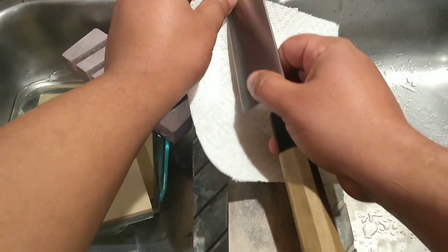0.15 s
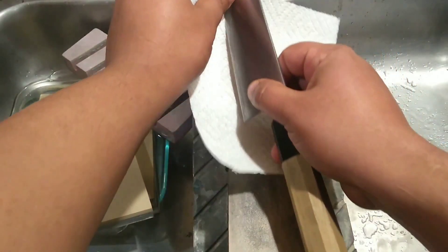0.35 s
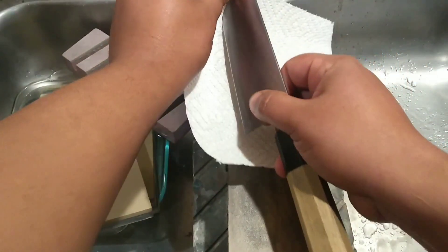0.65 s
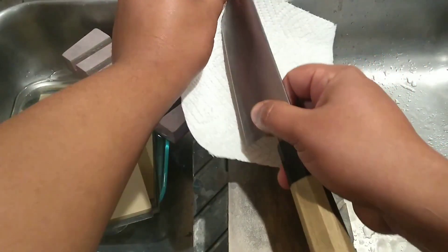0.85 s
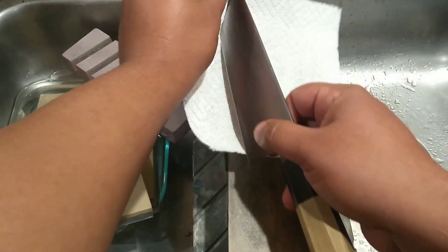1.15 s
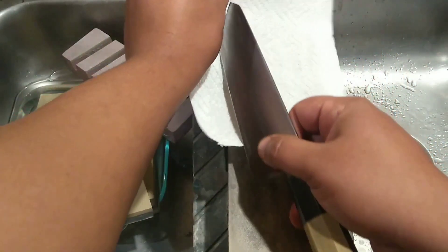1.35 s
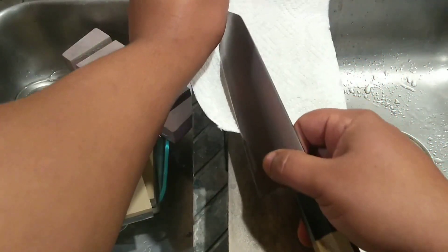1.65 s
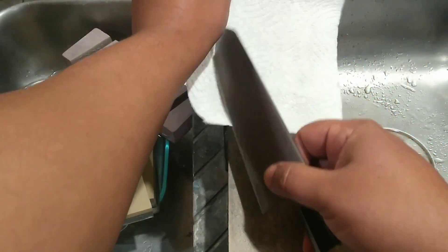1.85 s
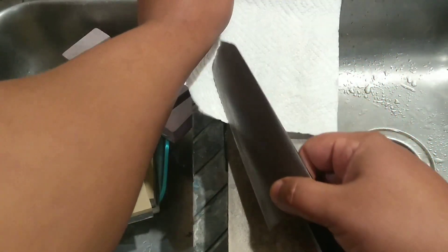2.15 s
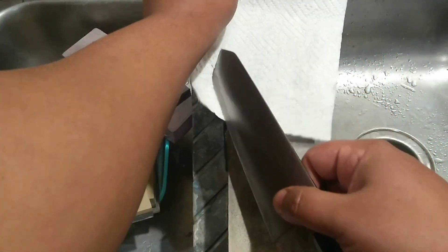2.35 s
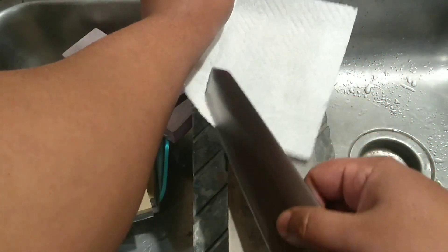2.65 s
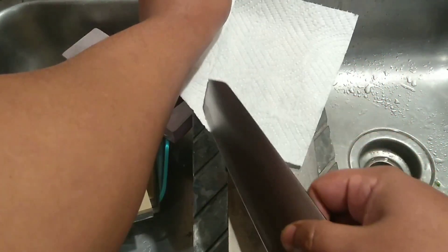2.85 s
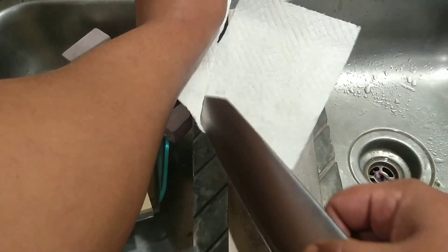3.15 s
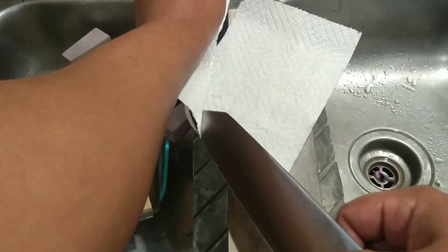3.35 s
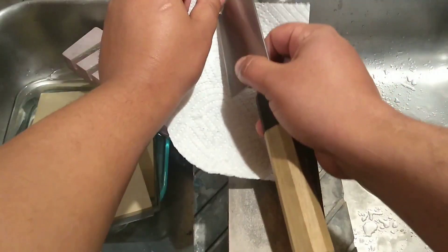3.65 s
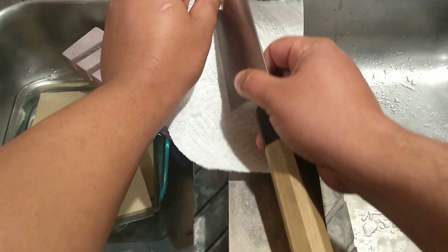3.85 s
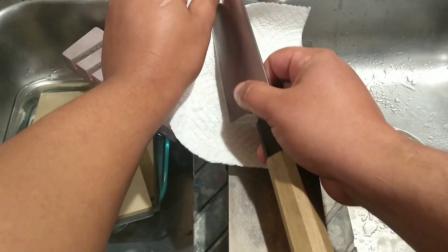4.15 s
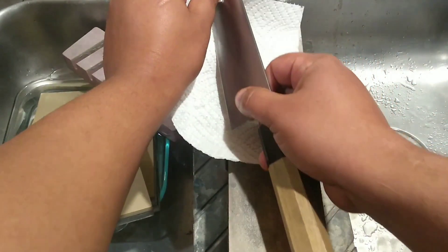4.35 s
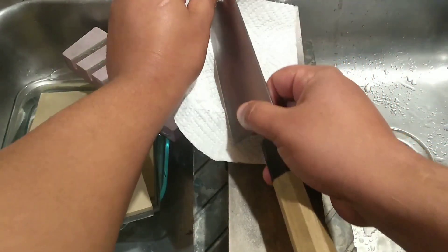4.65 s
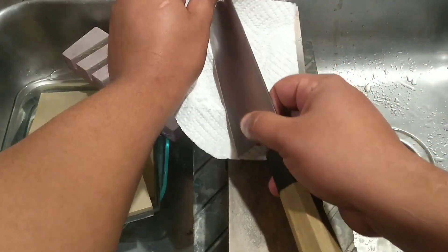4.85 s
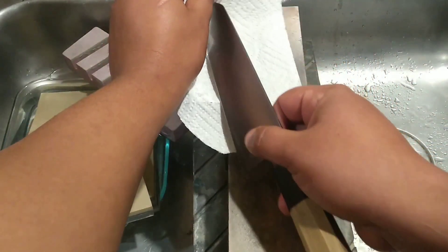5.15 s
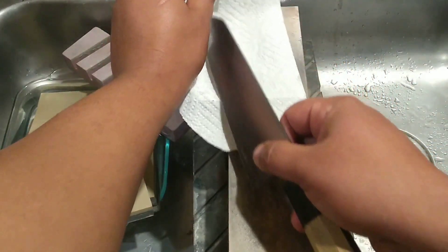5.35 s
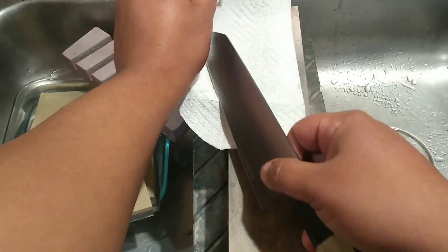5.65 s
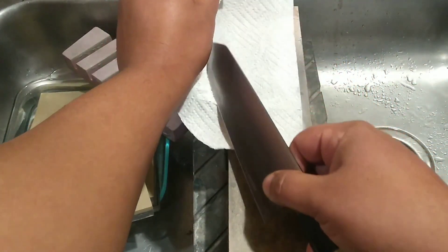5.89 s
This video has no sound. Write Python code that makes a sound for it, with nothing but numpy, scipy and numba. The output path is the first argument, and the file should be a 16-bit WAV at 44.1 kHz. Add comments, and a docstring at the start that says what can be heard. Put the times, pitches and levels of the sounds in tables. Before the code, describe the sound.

Close at a kitchen sink, a keen blade is drawn through a paper towel. Faint, broken scratches gather into coarse, crackling rips with papery hums and fine fizz. The cut ends; a tiny tick and a dull, low-ringing knock follow, cut off abruptly. A second draw starts thin and builds into rough tearing again. Quiet room, close stereo microphones.

```python
"""Knife cutting a paper towel

A sharpened kitchen knife is drawn twice, heel to tip, through a paper towel held over the whetstone at a sink.
Snap-modulated noise and sharp releases excite the spectra of the rasp, the sheet's modes and a fine fizz.
In spells the sheet hums with a gliding pitch; shaped noise makes a low rumble that swells, and a room tone.
Between the draws come a faint tick and a short dull burst with a low ring, stopped abruptly."""
import sys
import numpy as np
from scipy import signal
from scipy.fft import rfft, irfft, next_fast_len
from scipy.io import wavfile
from scipy.ndimage import uniform_filter1d, map_coordinates
from numba import njit

SR = 44100
rng = np.random.default_rng(int(sys.argv[2]) if len(sys.argv) > 2 else 0)


def store_pcm(level_fs):
    """Save levels as 16-bit WAV."""
    pcm = np.round(np.clip(level_fs, -1, 1) * 32767).astype(np.int16)
    wavfile.write(sys.argv[1], SR, np.atleast_2d(pcm).T)


N = 265482
SIZE = next_fast_len(N + SR // 2, real=True)
FREQS = np.fft.rfftfreq(SIZE, 1 / SR)
TIME = np.arange(N) / SR

# the edge catches and breaks through: (time [s], relative crack level [dB], thump relative to crack [dB],
# fizz relative to crack [dB], build-up time constant [s])
CATCHES = [(0.064, -49.5, -14, -14, 0.0039), (0.4494, -49.0, -9, -25, 0.0026),
           (0.639, -57, -22, -17, 0.0038), (0.6596, -50.5, -6, -11, 0.00061),
           (1.151, -43.5, -7, -23, 0.003), (1.3548, -48, 9, -21, 0.00046), (1.4488, -42.5, 2, -21, 0.00083),
           (1.6183, -41.5, -15, -24, 0.00036), (1.6764, -46.0, -5, -13.0, 0.0005),
           (1.7532, -45, -6, -15.0, 0.0025), (2.016, -33.5, -0.5, -13, 0.0039),
           (2.0981, -44, 6, -16, 0.0005), (2.3067, -43, 0, -5, 0.0021), (2.413, -31.5, -7, -16, 0.00058),
           (2.5721, -34.5, -3.5, -12, 0.00085), (2.6233, -50, 5, -8.5, 0.00058),
           (2.7709, -33.0, 4, -11, 0.0026), (2.8116, -33, -1.5, -13.5, 0.003),
           (2.8361, -28, -3, -17.5, 0.0033), (2.8553, -32.5, -5, -16, 0.0025),
           (2.894, -32, -5, -23, 0.0022), (2.902, -30.5, -7, -14.5, 0.0048),
           (2.934, -30.5, -13, -11.5, 0.003), (2.993, -37.5, -2, -19, 0.00041),
           (3.0144, -32, -3.5, -16.5, 0.00039), (3.2593, -31.5, -8, -13, 0.0042),
           (3.315, -35.5, 1.5, -16, 0.00046), (3.343, -37.5, -6, -10.5, 0.0043),
           (3.3832, -49.5, 8.5, -21, 0.00059), (3.4051, -30.5, -9.5, -17.5, 0.0033),
           (3.9917, -51, -25.0, -3.0, 0.00044), (4.0122, -48.5, -15, -5, 0.00046),
           (4.3524, -40.5, -1.5, -8, 0.0024), (4.7297, -49, -4, -31, 0.00059),
           (4.7625, -35.5, -29, -19, 0.00044), (4.8065, -42, -10, -17, 0.00054),
           (5.0724, -33, -16, -20.0, 0.001), (5.1513, -50, -17.5, -14, 0.0005),
           (5.2375, -46, -41, -14, 0.00056), (5.271, -45, -31.0, -9.5, 0.003),
           (5.4452, -33.5, -2.5, -15.0, 0.00066), (5.5638, -41.5, 0, -9, 0.0035),
           (5.7555, -38.5, -1.0, -17, 0.0005), (5.8506, -37.5, 0, -19, 0.00046),
           (5.8794, -29.0, 0, -17, 0.0027), (5.8997, -35.5, -6, -13.5, 0.00054),
           (6.0113, -42, 0.0, -10, 0.00046)]


def amp(db):
    """Level is logarithmic: decibels to amplitude ratio."""
    return 10 ** (np.asarray(db) / 20)


def unit(x):
    """Mean power sets the scale: normalise to rms 1."""
    return x / np.sqrt(np.mean(np.abs(x) ** 2) + 1e-20)


def along(points):
    """Spectra are interpolated on a logarithmic frequency axis, from (frequency [Hz], value) points."""
    hz, value = np.transpose(points)
    return np.interp(np.log(FREQS + 1), np.log(hz + 1), value)


def wobble(rate):
    """Slow random modulation: a smooth curve through Gaussian knots, rate [1/s]."""
    knots = rng.standard_normal(int(N * rate / SR) + 4)
    return map_coordinates(knots, [TIME * rate])


def filtered(x, response):
    """Linear filtering: the spectrum is multiplied by a frequency response."""
    return irfft(rfft(x, SIZE) * response, SIZE)[..., :N]


def colour(points, rings=()):
    """Minimum phase: the folded cepstrum of a level curve gives a causal response of energy 1."""
    level_db = along(points)
    for hz, width_hz, db in rings:
        level_db = level_db + db / (1 + (2 * (FREQS - hz) / width_hz) ** 2)
    cepstrum = irfft(np.log(amp(level_db) + 1e-6), SIZE)
    cepstrum[1:SIZE // 2] *= 2
    cepstrum[SIZE // 2 + 1:] = 0
    return unit(np.exp(rfft(cepstrum)))


def stereo(mid, side):
    """Sum and difference: left and right from middle and side."""
    return np.array([mid + side, mid - side])


@njit
def resonate(x, hz, width_hz):
    """Two-pole resonance with a moving pitch; the bandwidth sets its damping."""
    y = np.zeros(len(x))
    r = np.exp(-np.pi * width_hz / SR)
    for i in range(2, len(x)):
        drive = x[i] - x[i - 2]
        y[i] = 2 * r * np.cos(2 * np.pi * hz[i] / SR) * y[i - 1] - r * r * y[i - 2] + drive
    return y


def effort():
    """Excitation envelopes: rasp, drumming and fizz levels [dB] of pushes that rise, swell and let go."""
    # pushes of the edge through the paper: (start [s], length [s], relative rasp level [dB],
    # swell from start to end [dB], drumming relative to rasp [dB], fizz relative to rasp [dB])
    surges = [(0.0, 0.13, -68, 5, -2, -2), (0.139, 0.03, -56.5, -4, -3.5, -11.5),
              (0.185, 0.064, -66, -8, -7, -3.5), (0.339, 0.0055, -66.5, 11.5, -25, -12.5),
              (0.41, 0.12, -54, -3, -5, -11), (0.554, 0.1, -68, -1, -4, -15.0),
              (0.693, 0.0065, -53.5, 1, -9, -10), (0.736, 0.048, -50.0, -3.5, -1, -13.5),
              (0.816, 0.074, -68.5, 16, -4.0, -17), (0.907, 0.025, -53.5, 0.5, -12.5, -14.5),
              (1.047, 0.055, -59, 13, -7.5, -17), (1.12, 0.066, -51.0, -4, 1.5, -13),
              (1.247, 0.0084, -57, -7, -6, -17.0), (1.318, 0.11, -56, 12.5, 2.5, -15),
              (1.455, 0.053, -44, -1.5, 1, -14.5), (1.615, 0.094, -48, 3.5, -3.5, -12.5),
              (1.743, 0.052, -45, -5.5, -5, -12.5), (1.885, 0.18, -43, 3, -5, -13.5),
              (2.111, 0.11, -46.5, -3.0, 3.5, -11), (2.269, 0.047, -40, 1, 4.5, -12.5),
              (2.366, 0.067, -43.5, -1, 2.0, -10), (2.479, 0.076, -46.5, -11.5, -0.5, -9),
              (2.582, 0.17, -56, 6.5, -0.5, -9), (2.763, 0.18, -43.5, 5.5, -1.5, -13),
              (3.026, 0.022, -48, -2, -4, -13.5), (3.124, 0.014, -59.5, 11.5, 2.5, -19.0),
              (3.183, 0.091, -40, 6.5, -5, -14), (3.327, 0.098, -42.0, -1.5, -1.5, -11.5),
              (3.58, 0.12, -69.5, -4, -3.0, -10.0), (3.752, 0.024, -63.5, -3, -16, -2.5),
              (3.86, 0.01, -62.5, 6, -25, -8.0), (3.919, 0.045, -59, -3.5, -31, -2),
              (3.992, 0.041, -59, 8, -10, -2.5), (4.082, 0.071, -58.5, -3.5, 1.5, -2.5),
              (4.19, 0.033, -56.5, 5.0, -1, -6.5), (4.325, 0.026, -51, 7, -10.5, -10.5),
              (4.397, 0.19, -66.5, -5, -3.5, -15.5), (4.599, 0.055, -55.5, -2.5, -1.5, -16.5),
              (4.734, 0.09, -47.5, -10, -9.5, -15.0), (4.862, 0.039, -52, -6, -11.5, -15.5),
              (4.92, 0.13, -62.5, 13, -24, -17.0), (5.051, 0.062, -48, 5.5, -15.5, -13.5),
              (5.203, 0.089, -49.5, 2.5, -33, -13), (5.314, 0.111, -52.5, 6.5, -10.5, -14.5),
              (5.447, 0.12, -45.5, 2, -7, -13.0), (5.535, 0.053, -40, 4.5, 1, -10.0),
              (5.716, 0.07, -47, -1.5, -1, -14), (5.866, 0.045, -44.5, 3, 0, -11.5),
              (6.008, 0.014, -45.5, 16, -3, -21)]
    # the blade sliding between pushes: (rasp, drumming, fizz), relative levels [dB]
    slide_db = (-74, -90.5, -82)
    attack_s, release_s = 0.034, 0.038  # time to gain or lose 20 dB
    power = amp(slide_db)[:, None] ** 2 * np.ones(N)
    for start, length, db, swell_db, drum_db, fizz_db in surges:
        reach = length / 2 + 4 * (attack_s + release_s)
        near = np.abs(TIME - start - length / 2) < reach
        t = TIME[near] - start
        fade = np.maximum(-t, 0) / attack_s + np.maximum(t - length, 0) / release_s
        swell = swell_db * (np.clip(t / length, 0, 1) - 0.5)
        level = amp(db + swell - 20 * fade)
        power[:, near] += (amp([[0], [drum_db], [fizz_db]]) * level) ** 2
    return 10 * np.log10(power)


def fibres(rate, spread_db, life, clump_db, rub, slip_rate, slip_life, slip_db):
    """Shot noise: random snaps over a smooth rub, rms 1; each slip starts a dying flurry."""
    snap_db = spread_db * np.minimum(rng.standard_normal(N), 2)
    sizes = (rng.random(N) < rate / SR) * amp(snap_db)
    power = signal.lfilter([1], [1, -np.exp(-1 / (life * SR))], sizes ** 2)
    slip_starts = 1.0 * (rng.random(N) < slip_rate / SR)
    slips = signal.lfilter([1], [1, -np.exp(-1 / (slip_life * SR))], slip_starts)
    strength = np.sqrt(power / power.mean() + abs(rub))
    return unit(strength * amp(clump_db * wobble(70) + slip_db * np.tanh(slips)))


def catches(levels_db, t60, scatter):
    """Strain and release: fraying builds exponentially to a sharp middle impulse and a dying spray."""
    fray_s = 0.011  # a build-up this long doubles the spray factor beside the release
    lead = SR // 20
    force = np.zeros((2, N + SR))
    t = np.arange(-lead, 2 * lead) / SR
    for (s, *_, build_s), db in zip(CATCHES, levels_db):
        decay = amp(-60 * np.maximum(t, 0) / t60)
        build_up = np.exp(np.minimum(t, 0) / build_s)
        spray = rng.standard_normal((2, len(t))) * decay * build_up
        spray *= scatter * (1 + build_s / fray_s) / np.linalg.norm(spray[0])
        spray[0, lead] += 1
        event = spray / np.linalg.norm(spray, axis=1, keepdims=True)
        force[:, round(s * SR):][:, :len(t)] += amp(db) * event
    return force[:, lead:lead + N]


def wander(force, depth_db):
    """Time-varying excitation: the moving edge favours different frequencies from moment to moment."""
    spectrum = signal.stft(force, nperseg=1024)[2]
    field = rng.standard_normal(spectrum.shape[1:])
    for size in (3, 4):
        field = uniform_filter1d(field, size=size, axis=0)
        field = uniform_filter1d(field, size=2 * size, axis=1)
    gain = unit(amp(depth_db * unit(field)))
    return signal.istft(spectrum * gain, nperseg=1024)[1][:, :N]


def rasp(force, side_db, body_hz, deep_hz, high_hz):
    """Forced resonance: parting fibres ring in paper and blade, and a slack sheet rings lower."""
    # rasp spectra in the middle and at the sides: (frequency [Hz], relative density [dB])
    mid_spectrum = [(360, -44), (620, -19.5), (676, -11.5), (907, -1), (1030, -2.5), (1420, 1.5),
                    (1660, -4), (1770, -10.5), (1910, -13.5), (2210, -24), (2610, -18), (3130, -4),
                    (3470, -5.5), (4380, -17), (4900, -64), (6370, -49), (10800, -120)]
    side_spectrum = [(360, -26), (620, -14.5), (706, -7.5), (818, -12), (955, -15.5), (1090, -22.5),
                     (1260, -32), (1450, -7), (1800, -5.5), (2080, 1), (2270, -3), (2970, -8.5),
                     (3470, -15), (4340, -5), (4900, -10), (6370, -72), (10800, -120)]
    # resonances of blade and sink: (frequency [Hz], width [Hz], level change [dB])
    rings = [(621, 12, 13), (774, 35, 6.5), (898, 14, 3.5), (946, 110, 3.5), (1093, 26, 5), (1252, 22, 3),
             (1422, 170, 3), (1628, 29, 6), (1867, 32, 4.5), (2590, 85, 8), (2560, 20, -2.5), (2873, 27, 6),
             (2998, 98, 5.5), (3357, 123, 5), (3590, 44, 7.5), (3960, 107, 6)]
    # slackening of the cut sheet: (time [s], low edges raised and high edge lowered by [dB])
    slack = [(0, -3.5), (.6, 3.5), (1.5, 1.5), (2.1, 3.5), (2.85, 1.5), (3.45, 6), (3.9, -8.5), (4.5, 2),
             (5.1, -1), (5.55, -1.5), (6.02, 0.5)]
    slack_db = np.interp(TIME, *np.transpose(slack))

    def band(hz, width_hz):
        return filtered(force, np.exp(-((FREQS - hz) / width_hz) ** 2))

    low_edges = band(body_hz, 255) + band(deep_hz, 570)
    high_edge = band(high_hz, 500)
    mid, side = force + (amp(slack_db) - 1) * low_edges + (amp(-slack_db) - 1) * high_edge
    mid = filtered(mid, colour(mid_spectrum, rings))
    return stereo(mid, amp(side_db) * filtered(side, colour(side_spectrum, rings)))


def hum_spells():
    """Frequency modulation: spells of humming, each with a gliding pitch [Hz] and drumming share [0-1]."""
    # spells of humming: (start [s], length [s], pitch [Hz], glide from start to end [Hz],
    # share of the drumming [0-1])
    hums = [(0, .08, 253.7, 14.5, 0.86), (1.361, .36, 318.2, 19, 0.57), (2.1, 0.0619, 197, 10, 0.29),
            (3.592, 0.13, 275, -26, 0.8), (3.998, .17, 312, 17, 0.97), (4.336, 0.085, 322, -7.5, 0.67),
            (5.363, 0.14, 252, 22, 0.69), (5.73, 0.055, 266, 11.5, 0.48)]
    rest_hz, rest_share = 299.4, 0.028  # between spells
    ease_s = 0.087  # time to fade into or out of a spell
    pitch, share = np.full(N, rest_hz), np.full(N, rest_share)
    for start, length, hz, glide_hz, spell_share in hums:
        t = TIME - start
        presence = np.clip(1 + np.minimum(t, length - t) / ease_s, 0, 1)
        target_hz = hz + glide_hz * np.clip(t / length, 0, 1)
        pitch += np.minimum(2 * presence, 1) * (target_hz - pitch)
        share += presence * (spell_share - share)
    return pitch, np.clip(share, 0, 1)


def drumming(force, side_db, moving_db, moving_width_hz, low_hz):
    """Modal superposition: the sheet sounds in fixed modes and one of moving pitch."""
    # modes of the sheet: (frequency [Hz], width [Hz], relative level [dB])
    sheet = [(323.8, 33.8, 0.5), (437.5, 53.3, 2.5), (523, 67, -1), (169, 10, -21.5)]
    modes = 0
    for k, (hz, width_hz, db) in enumerate(sheet):
        damping = 1j * FREQS * width_hz
        modes = modes + (-1) ** k * amp(db) * damping / (hz * hz - FREQS ** 2 + damping)
    pitch, share = hum_spells()
    # at the largest shares the noise-driven resonance gives way to the pure hum
    moving_force = force * np.sqrt(share - share ** 4)
    moving = np.array([resonate(f, pitch, float(moving_width_hz)) for f in moving_force])
    moving = moving * np.sqrt(np.pi * moving_width_hz / SR / 2)
    band = colour([(60, -22), (low_hz, -4), (320, 0), (380, -4), (430, 0), (540, 0), (660, -9), (1200, -30)])
    fixed_modes = filtered(force * np.sqrt(1 - share), unit(modes))
    mid, side = filtered(fixed_modes + amp(moving_db) * moving, band / np.abs(band).max())
    side_tilt = amp(along([(180, 15), (330, 1.0), (500, -3.5)]))
    return stereo(mid, amp(side_db) * filtered(side, side_tilt))


def fizz(force, diffuse_db, echo_db, count=8):
    """Arrival delay and scattering: fine snaps reach the right first, with echoes off the steel sink."""
    # fizz spectrum: (frequency [Hz], relative density [dB])
    fizz_spectrum = [(3500, -20), (4600, 0), (5600, 1), (6600, -1.5), (8000, -3), (10000, -8), (12000, -7),
                     (14800, -10), (16000, -29)]
    lag_s = 14 / SR  # travel time from the right microphone to the left one
    left, right = stereo(force[0], -amp(diffuse_db) * force[1])
    left = filtered(left, np.exp(-2j * np.pi * FREQS * lag_s))
    echoes = np.zeros((2, SIZE))  # copies 1 to 10 ms late
    for ear in echoes:
        delays = rng.integers(SR // 1000, SR // 100, count)
        ear[delays] = amp(echo_db) * rng.choice([-1, 1], count) / np.sqrt(count)
    return filtered(np.array([left, right]), colour(fizz_spectrum) * unit(1 + rfft(echoes)))


def hum(drum_db, waver, flutter_db):
    """Phase accumulation: a sine of gliding, wavering pitch, loudest where its share is largest."""
    pitch, share = hum_spells()
    phase = 2 * np.pi * np.cumsum(pitch * (1 + waver * wobble(90))) / SR
    level = share ** 2 * amp(drum_db + flutter_db * wobble(50))
    return level * stereo(np.sin(phase), 0.57 * np.cos(phase))


def cutting(levels_db):
    """Common excitation: one pattern of fibre snaps and catches drives rasp, drumming and fizz."""
    shared_waver_db, drum_waver_db = 1.0, 1.5  # random level wavering of all layers, and of drumming alone
    rasp_db, drum_db, fizz_db = levels_db + shared_waver_db * wobble(40)
    _, crack_db, thump_db, spit_db, _ = np.transpose(CATCHES)
    # rates in 1/s, lives in s
    grain = fibres(rate=650, spread_db=4.0, life=0.0013, clump_db=1, rub=0.46,
                   slip_rate=38, slip_life=0.0039, slip_db=5.0)

    def snaps(db):
        return amp(db) * grain * rng.standard_normal((2, N))

    drum_db = drum_db + drum_waver_db * wobble(30)
    scrape = wander(snaps(rasp_db), depth_db=3)
    cracks = catches(crack_db + 23.5, t60=0.025, scatter=1.48)
    body = rasp(scrape + cracks, side_db=-5.0, body_hz=760, deep_hz=2390, high_hz=3690)
    thumps = catches(crack_db + thump_db + 24.5, t60=0.024, scatter=0.58)
    sheet_sound = drumming(snaps(drum_db + 0.5) + thumps, side_db=-7.0, moving_db=-2.5,
                           moving_width_hz=52, low_hz=203)
    spits = catches(crack_db + spit_db + 25, t60=0.028, scatter=2.3)
    fine = fizz(snaps(fizz_db) + spits, diffuse_db=-1.5, echo_db=-4.5)
    return body + sheet_sound + fine + hum(drum_db + 5.0, waver=0.049, flutter_db=3.5)


def kitchen(x, t60):
    """Diffuse reverberation: sink and walls answer with exponentially decaying noise after 4 ms."""
    t = np.arange(SR // 2) / SR
    tail = rng.standard_normal((2, len(t))) * amp(-60 * t / t60) * (t > 0.004)
    tail = tail / np.linalg.norm(tail[0])
    mid_side = stereo(*x) / 2
    return stereo(*signal.fftconvolve(mid_side, tail, axes=1)[:, :N])


def rumble(drum_db, side_db):
    """Amplitude-modulated noise: low rumble follows drumming, swells and catches, mostly in antiphase."""
    # rumble spectrum: (frequency [Hz], relative density [dB])
    rumble_spectrum = [(20, -3.5), (55, -7.5), (90, 1.5), (130, -4.5), (180, -6), (260, -23), (600, -78)]
    # short swells of low-frequency rumble: (peak time [s], half length [s], relative level [dB])
    swell_table = [(1.45, 0.029, -82), (2.42, .02, -75), (3.565, .012, -78), (4.38, 0.054, -74),
                   (4.62, 0.046, -69), (4.82, 0.071, -73), (5.88, 0.018, -64)]
    steady_db, follow_db = -104, -46.5  # constant part, and part relative to drumming
    swells = sum(amp(db) * np.exp(-((TIME - s) / half) ** 2 / 2) for s, half, db in swell_table)
    envelope = amp(steady_db) + amp(drum_db + follow_db) + swells
    _, crack_db, thump_db, *_ = np.transpose(CATCHES)
    noise = rng.standard_normal((2, N)) * envelope * amp(-2 + 1.1 * wobble(19))
    thumps = catches(crack_db + thump_db - 14.5, t60=0.006, scatter=0.41)
    mid, side = filtered(noise + thumps, colour(rumble_spectrum))
    return stereo(mid, amp(side_db) * side)


def room_tone(db):
    """Stationary noise: the faint steady background of the kitchen, shaped by its spectrum."""
    # background spectrum: (frequency [Hz], relative density [dB])
    tone_spectrum = [(20, -9), (64, -31), (200, -9.5), (420, -4), (700, -24), (1400, -4), (1950, -2),
                     (2200, -57), (2630, -4), (3340, -10.5), (4500, -10.5), (14300, -18), (15500, -47)]
    mid, side = filtered(rng.standard_normal((2, N)), colour(tone_spectrum))
    return amp(db) * stereo(mid, 0.88 * side)


def tick_and_burst(stop, side_db, ring_hz, ring_t60, ring_db):
    """Damped oscillation: a faint tick, then a short dull noise burst with a low ring, stopped abruptly."""
    # onsets of tick and burst: (time [s], relative level [dB], 60 dB decay time [s])
    onsets = [(3.529, -55.5, 0.054), (3.5544, -31.5, 0.073), (3.565, -32.5, 0.066)]
    # spectrum of tick and burst: (frequency [Hz], relative density [dB])
    burst_spectrum = [(60, -36), (150, -38), (320, -5.5), (450, -3.5), (525, -9), (636, -28), (800, -10.5),
                      (1090, -8.5), (1670, -14.5), (2310, -24.5), (3090, -18.5), (4290, -33),
                      (10200, -43.5), (15000, -53)]
    force = np.zeros((2, N))
    for s, db, t60 in onsets:
        decay = amp(db - 2.5 - 60 * np.abs(TIME - s) / t60) * (TIME >= s)
        force += decay * rng.standard_normal((2, N))
        force[0, round(s * SR)] += amp(db + 10.0)
    mid, side = filtered(force, colour(burst_spectrum))
    t = np.maximum(TIME - onsets[-1][0], 0)
    ring = amp(ring_db - 60 * t / ring_t60) * np.sin(2 * np.pi * ring_hz * t)
    high_pass = signal.butter(2, 280, 'high', fs=SR, output='sos')
    mid = mid + signal.sosfilt(high_pass, ring)
    side_tilt = amp(along([(100, -1), (330, -7), (500, -3), (1200, -20), (2000, 10), (4000, 0)]))
    side = amp(side_db) * filtered(side, side_tilt)
    ending = np.clip((stop - TIME) / 0.0059, 0, 1)  # silent from stop on
    return stereo(mid, side) * ending


def scene():
    """Superposition: cutting, its reverberation, tick and burst, rumble and background add."""
    levels_db = effort()
    cut = cutting(levels_db)
    burst = tick_and_burst(stop=3.58, side_db=1.5, ring_hz=456, ring_t60=0.065, ring_db=-27.5)
    reverberation = amp(-20.5) * kitchen(cut, t60=0.15)
    low = rumble(levels_db[1], side_db=11.5)
    return cut + reverberation + burst + low + room_tone(db=-75.5)


def record(dry):
    """Linear filtering: left and right differ in tone colour, and both end at an upper band limit."""
    # tone colour of the channels: (frequency [Hz], left minus right [dB])
    lean = [(60, -4), (140, 4), (330, -1.5), (500, -1.5), (770, 0), (1100, 0.5), (1400, 2.5), (1790, 3),
            (2150, 1), (2740, -7), (3500, -0.5), (4190, -1), (6410, -3.5), (9810, -5), (15000, 1)]
    top_hz = 15750
    lean_db = along(lean) / 2
    return filtered(dry, amp([lean_db, -lean_db]) * (FREQS < top_hz))


dry = scene()
out = record(dry)
store_pcm(out)
```